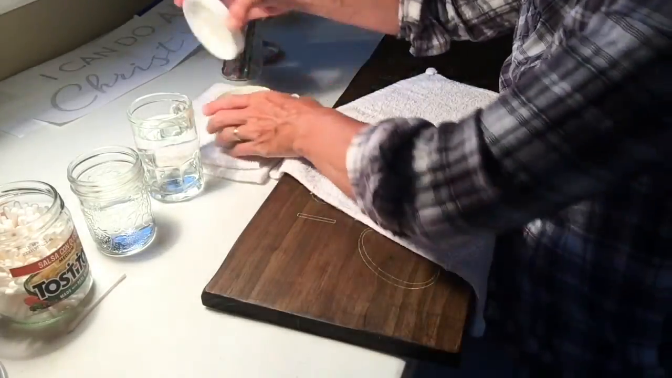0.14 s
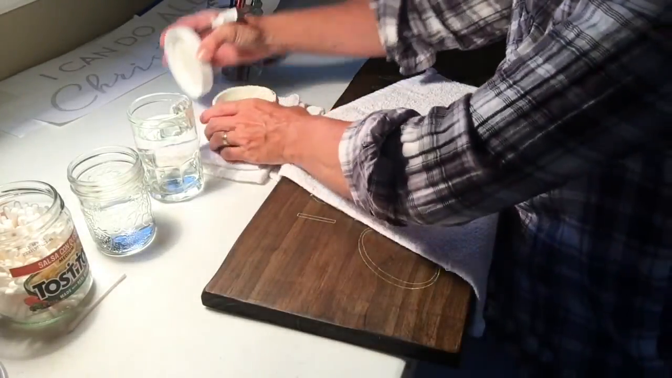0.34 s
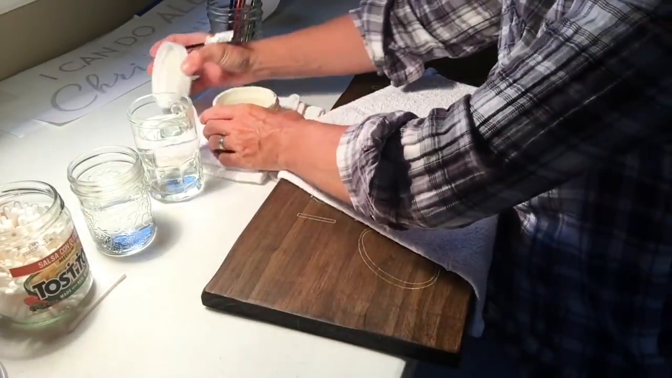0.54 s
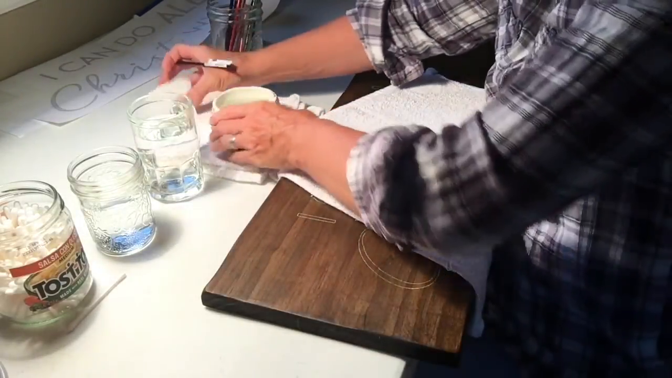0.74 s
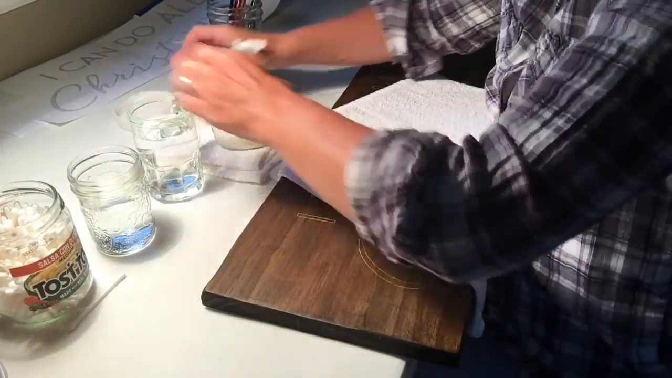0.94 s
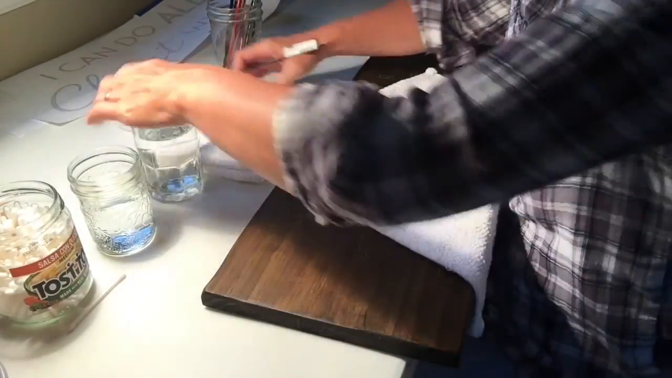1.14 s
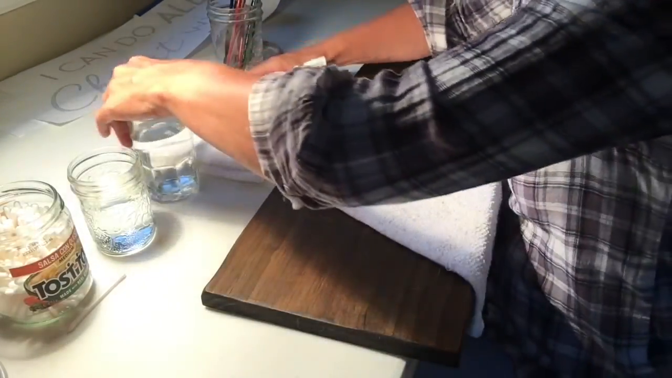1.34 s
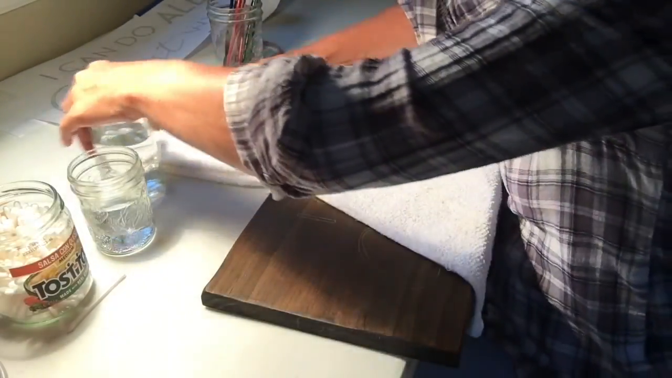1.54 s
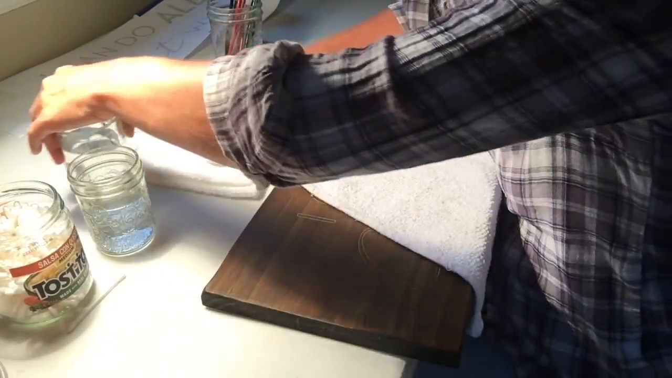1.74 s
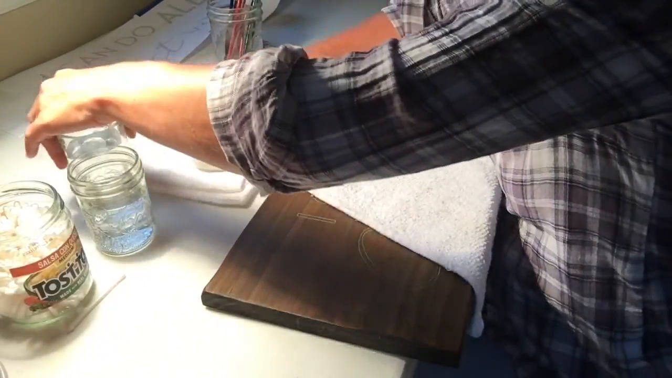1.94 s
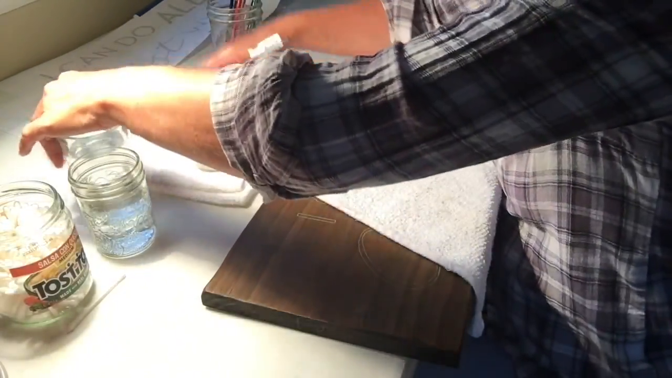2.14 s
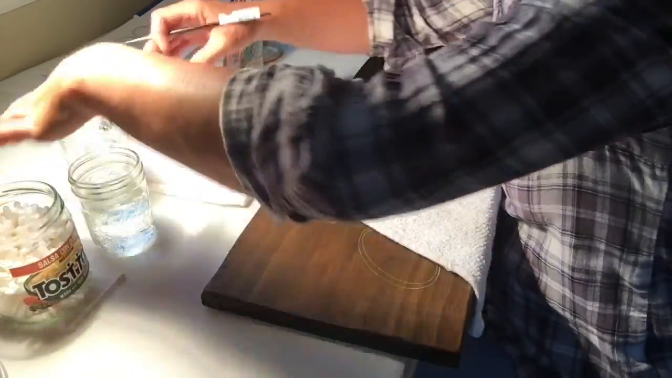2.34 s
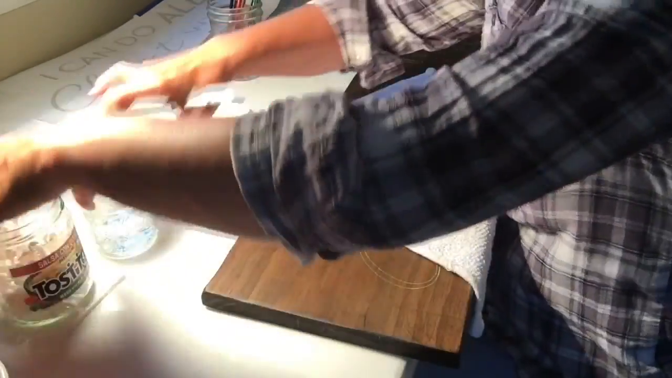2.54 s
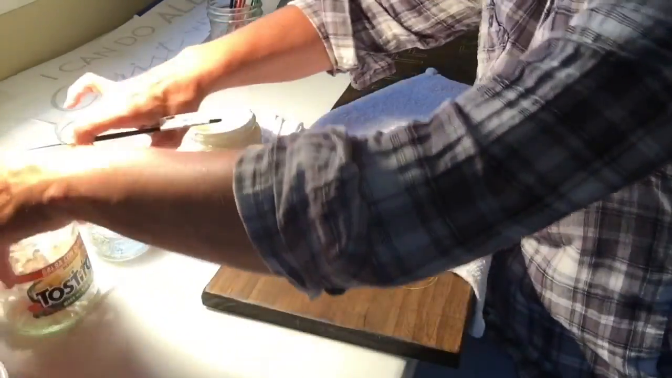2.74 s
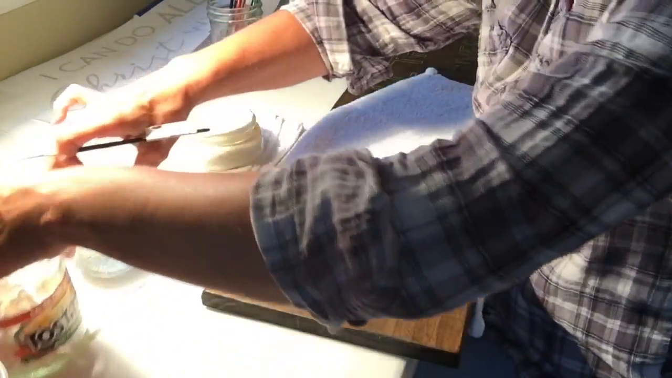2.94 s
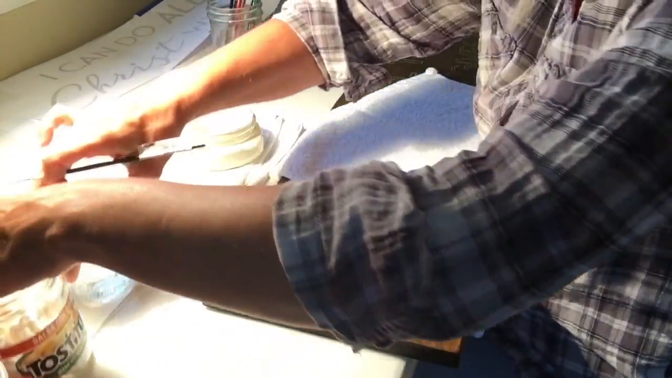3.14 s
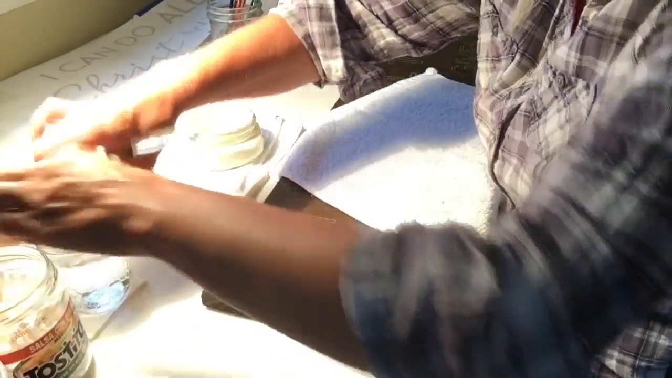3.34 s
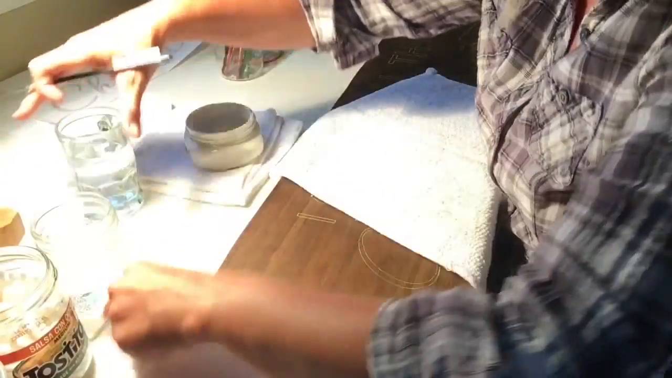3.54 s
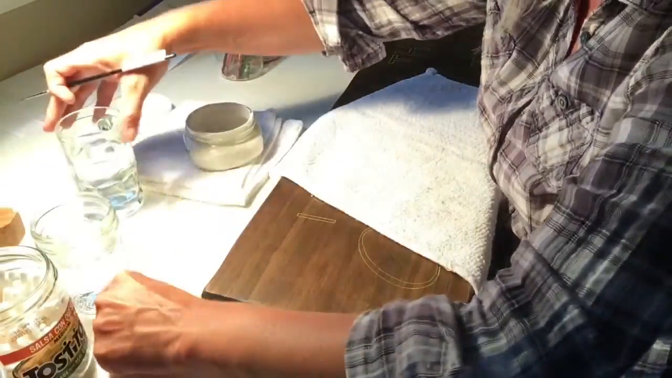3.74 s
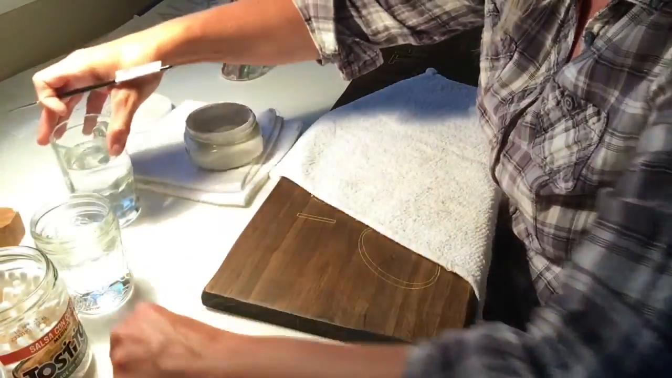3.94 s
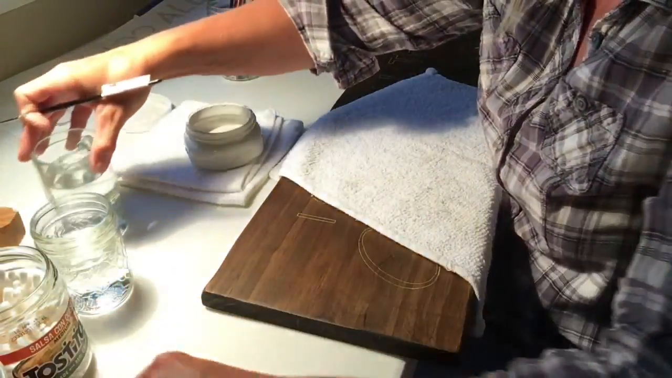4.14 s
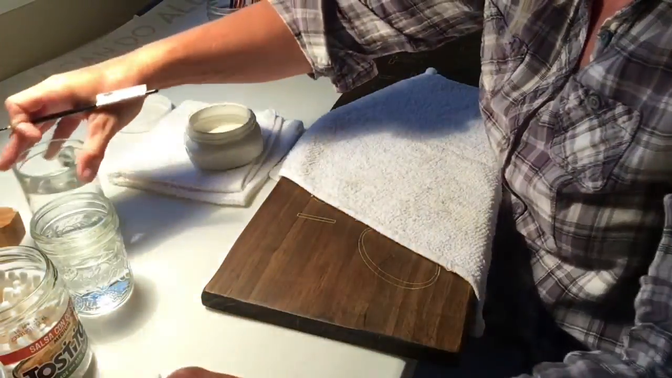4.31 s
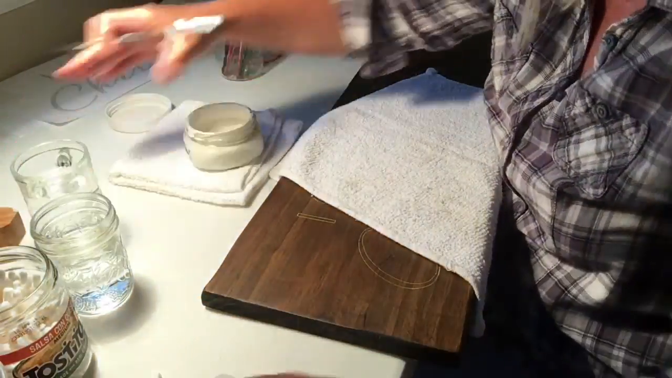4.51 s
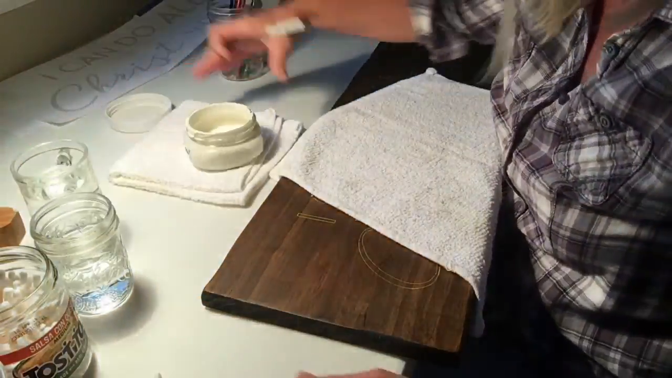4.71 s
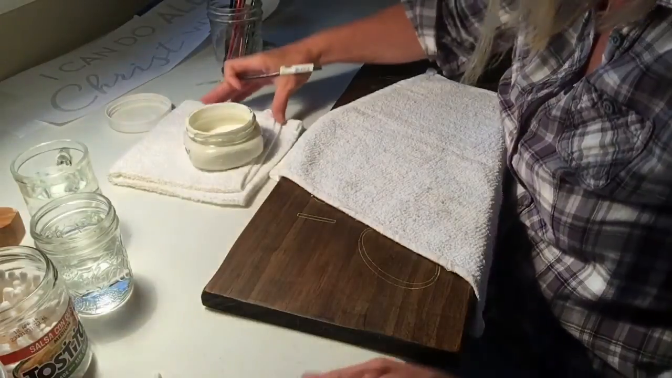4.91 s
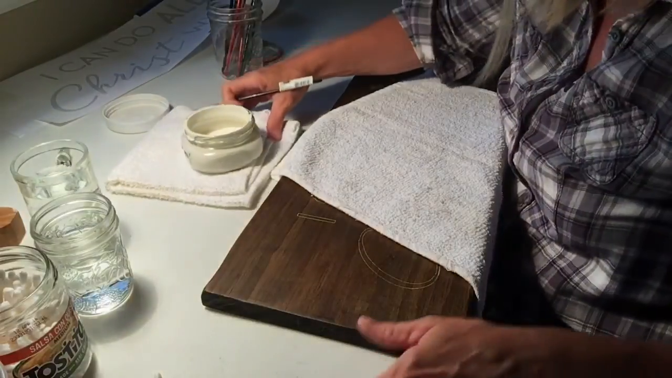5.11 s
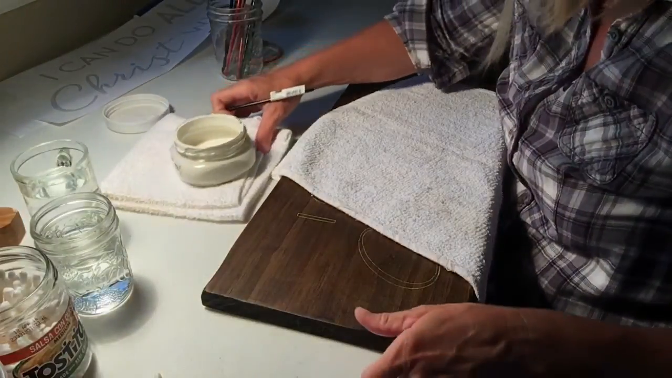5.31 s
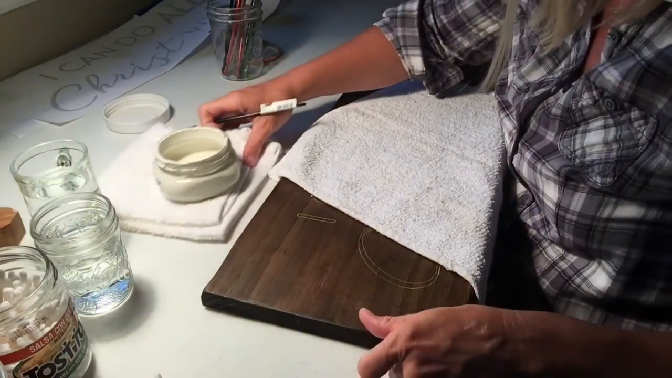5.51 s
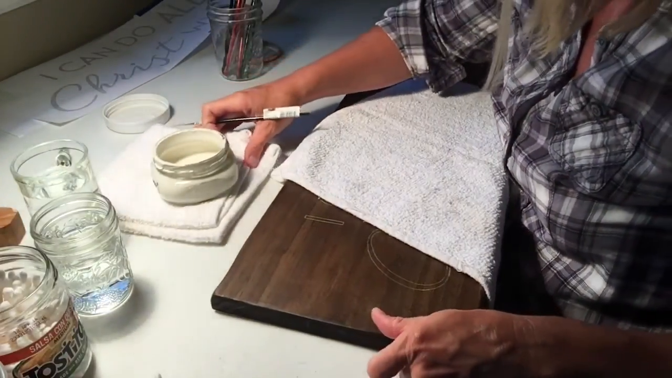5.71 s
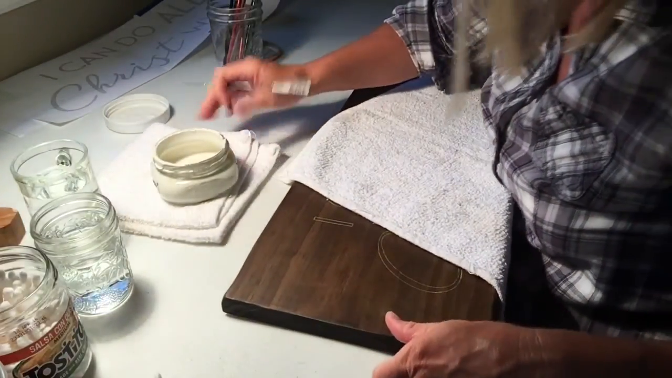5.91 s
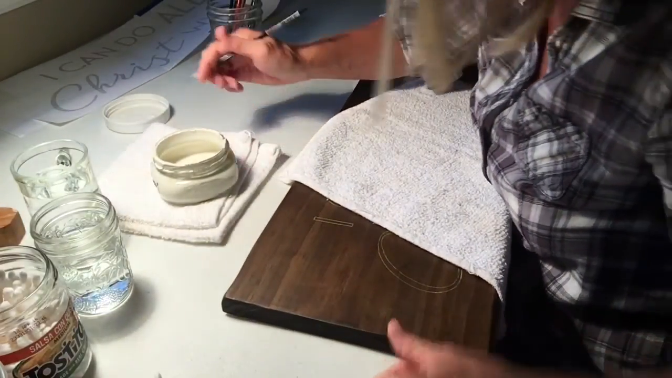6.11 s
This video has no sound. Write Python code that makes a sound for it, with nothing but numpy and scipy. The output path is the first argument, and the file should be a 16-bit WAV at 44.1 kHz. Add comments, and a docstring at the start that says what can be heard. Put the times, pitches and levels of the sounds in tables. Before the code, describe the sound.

Close up in a quiet little room, a few faint ticks lead to a lid clattering and sliding on a wooden tabletop. A glass jar scrapes along the wood and clinks twice against another with a short ring. Two more drags follow, making the hollow table rumble, and finally cloth rustles gently as a folded towel is pushed about.

```python
"""A small quiet room, close to a hollow wooden table that hands are clearing. A lid drops, bounces and
skids; water jars are dragged over the wood and clink together; a folded towel is pushed about.
Knocks are bursts of tiny contacts that ring the object and the table top, and clinks ring the glass
walls. Scrapes and rustles are dense slips of friction, with the table rumbling underneath."""
import sys
import numpy as np
from scipy import signal
from scipy.fft import rfft, irfft
from scipy.io import wavfile
from scipy.ndimage import uniform_filter1d

SR = 44100
rng = np.random.default_rng(int(sys.argv[2]) if len(sys.argv) > 2 else 0)


def digitize_waveform(pressure):
    """Quantize a signal to 16-bit integers and store it at the path in sys.argv[1].

    Rows of a 2-D input are taken as channels; values are limited to [-1, 1].
    """
    field = np.atleast_2d(pressure).T
    bounded = np.clip(field, -1, 1)
    quanta = np.round(bounded * 32767).astype(np.int16)
    wavfile.write(sys.argv[1], SR, quanta)


N = 276374

# modes of the table top: pitch_hz; and for each: level_db, t60_s
TOP_HZ = [95, 145, 196, 265, 357, 409, 480, 645, 696, 800, 873, 940, 1170]
TOP_RING = [(-63, .2), (-2, 1), (-15.5, 0.53), (-23, 0.16), (-19, 0.078), (-40, 0.053), (-13, 0.06),
            (-19, 0.19), (-34, 0.38), (-7.5, 0.082), (-21, 0.099), (-6.5, 0.047), (-25, 0.039)]
# brief modes of the lid and jar bases: pitch_hz; and for each: level_db, t60_s
OBJECT_HZ = [552, 700, 900, 1180, 1400, 2050, 2380, 2770, 3300, 4150, 5500]
OBJECT_RING = [(-1, .12), (-2, .06), (-5, .05), (-7, .04), (-6, .05), (-11, .03), (-10, .04), (-5, .06),
               (-12, .03), (-13, .04), (-20, .025)]
# spectra of a hard scrape on wood and of fine grit or fibres: freq_hz, level_db
SCRAPE_EQ = [(300, -48), (600, -7), (1000, -1), (1600, -4.5), (2200, -3), (2900, -1), (3500, -5.5),
             (4500, -8), (5200, -16), (9000, -30.5), (12000, -41)]
GRIT_EQ = [(3500, -30), (6000, -5.5), (8000, -13), (10500, -17.5), (13000, -13.5), (15500, -17.5)]


def gain_of(db):
    """Decibels to a factor."""
    return 10 ** (np.asarray(db) / 20)


def unit_rms(x):
    """Scales to rms 1."""
    return x / np.sqrt(np.mean(x ** 2) + 1e-20)


def curve_at(points, hz):
    """Joins points with straight lines on a log-frequency axis."""
    freq_hz, value = np.transpose(points)
    return np.interp(np.log(hz + 1), np.log(freq_hz + 1), value)


def add(mix, start_s, sound):
    """Mixes a sound in at start_s."""
    part = mix[round(start_s * SR):][:len(sound)]
    part += sound[:len(part)]


def colour(x, eq, tilt_db=0.):
    """Minimum-phase EQ of unit energy, tilted by tilt_db per octave about 2 kHz."""
    hz = abs(np.fft.fftfreq(4096, 1 / SR))
    shape_db = curve_at(eq, hz) + tilt_db * np.log2((hz + 50) / 2000)
    log_gain = np.log(gain_of(np.maximum(shape_db, -100)))
    taps = np.fft.ifft(np.exp(np.conj(signal.hilbert(log_gain)))).real[:2048]
    return signal.oaconvolve(x, taps / np.linalg.norm(taps))[:len(x)]


def modes(pitches_hz, rows):
    """Joins pitches with their levels and decays."""
    return [(hz, *row) for hz, row in zip(pitches_hz, rows)]


def ring(x, partials, tilt_db=0., free=1):
    """Each mode answers a click with a dying sine; free scales the ring time."""
    length_s = min(.5, .02 + free * max(t60 for *_, t60 in partials))
    t = np.arange(0, length_s, 1 / SR)
    tail = np.zeros(len(t))
    for hz, db, t60 in partials:
        decay_db = 60 * t / max(free * t60, .01)
        tail += gain_of(db + tilt_db * np.log2(hz / 3000) - decay_db) * np.sin(2 * np.pi * hz * t)
    attack = (1 - np.exp(-t / .0003)) ** 2  # contact takes a moment
    return signal.oaconvolve(x, tail * attack)[:N]


def softened(x, keep):
    """Light contacts last longer than a hard blow, so they are duller."""
    return signal.lfilter([1 - keep], [1, -keep], x)


def contacts(decay_s, per_s, after_db):
    """A first blow, then small irregular contacts that die away."""
    t = np.arange(SR // 4) / SR
    chance, size = rng.random((2, len(t)))
    x = gain_of(after_db) * (chance < per_s / SR) * (2 * size - 1) * np.exp(-t / decay_s)
    x[0] = 1
    return x


def bounces(decay_s, gap_s, after_db):
    """A first blow, then quick, nearly even rebounds that die away."""
    jitter, size = rng.random((2, 60))
    times_s = np.cumsum(gap_s * (.7 + .54 * jitter))
    x = np.zeros(SR // 2)
    x[(times_s * SR).astype(int)] = gain_of(after_db - 3.8 * size) * np.exp(-times_s / decay_s)
    x = softened(x, keep=.27)
    x[0] = 1
    return x


def friction(spread_db, flutter_db):
    """Dense slips of uneven size; the pressure flutters from bump to bump."""
    flutter = unit_rms(uniform_filter1d(uniform_filter1d(rng.standard_normal(N), 300), 300))
    size = gain_of(spread_db * rng.exponential(1, N) + flutter_db * flutter)
    return unit_rms(size * rng.standard_normal(N))


def short_strokes(rows):
    """Turns rise, hold and fall into curves of scrape and weight, each with its layer mix."""
    ease_db = np.array([-19.5, 0, 0, -19.5])
    strokes = []
    for start_s, rise_s, hold_s, fall_s, scrape_db, weight_db, *mix in rows:
        times_s = np.cumsum([start_s, rise_s, hold_s, fall_s])
        strokes.append((np.transpose([times_s, scrape_db + ease_db, weight_db + ease_db]), mix))
    return strokes


def envelopes(strokes):
    """Gains of scrape, weight, grit, sway, ring; grit and ring are set against scrape, sway weight."""
    # dB that grit, sway and ring lose for each dB their leading layer eases
    follow_ratios = [0.91, .5, 1.26]
    gains = np.zeros((5, N))
    for curve, mix in strokes:
        times_s, scrape_db, weight_db = np.transpose(curve)
        t = np.arange(times_s[0], times_s[-1], 1 / SR)
        fade = signal.windows.tukey(len(t), min(.03 / (times_s[-1] - times_s[0]), 1))
        layers_db = [scrape_db, weight_db]
        for offset_db, ratio, lead in zip(mix, follow_ratios, (scrape_db, weight_db, scrape_db)):
            layers_db.append(offset_db + lead.max() + ratio * (lead - lead.max()))
        for gain, db in zip(gains, layers_db):
            add(gain, times_s[0], gain_of(np.interp(t, times_s, db)) * fade)
    return gains


def room_tone():
    """Steady low room noise with a faint hiss."""
    # spectrum of the still room: freq_hz, level_db
    air_eq = [(12, -45), (20, -5.5), (67, 1.5), (138, -15.5), (222, -8.5), (328, -11), (485, -17.5),
              (678, -14), (759, -20.5), (949, -18.5), (2820, -25.5), (3950, -25), (4420, -28),
              (16000, -42.5)]
    shape = gain_of(curve_at(air_eq, np.fft.rfftfreq(N, 1 / SR)))
    return gain_of(-65) * unit_rms(irfft(rfft(rng.standard_normal(N)) * shape, N))


def pings():
    """Small things on the table ring faintly, one mode each."""
    # single rings: start_s, level_db, pitch_hz, t60_s
    cues = [(0.256, -65.5, 3120, 0.099), (2.472, -70, 1280, 3.9), (3.398, -58, 1290, 0.062),
            (3.537, -59, 1140, .06), (5.066, -45, 2040, 0.037), (5.217, -46.5, 2090, 0.042),
            (5.73, -48, 264, 0.31)]
    out = np.zeros(N)
    for start_s, level_db, pitch_hz, t60_s in cues:
        add(out, start_s, ring([1.], [(pitch_hz, level_db, t60_s)]))
    return out


def knocks():
    """Each landing ticks, rattles on, rings the object and thumps the table top."""
    # landings: start_s, tick_db, hardness_db_per_octave, thump_db, rattle_s
    cues = [(0.323, -56, 7, -58.5, 0.011), (0.4423, -51, 5.5, -73, 0.004), (0.5176, -47.5, 9, -62, 0.016),
            (0.5426, -32.5, 7.5, -58, 0.0028), (0.637, -50, 10.5, -77, 0.021),
            (0.7214, -16, 0.74, -22, 0.016), (0.987, -31, 1, -32, 0.022),
            (0.9904, -15.5, 2.6, -29.5, 0.016), (1.047, -18.5, 3.5, -34, 0.014),
            (1.0861, -22, 1.2, -44, 0.013), (1.0953, -21.5, 2, -49, 0.013), (1.3, -50, 1, -51, 0.0063),
            (2.0128, -26.5, 2, -35.5, 0.024), (2.2633, -34.5, 1.3, -47.5, 0.0025),
            (2.611, -42, 1, -73, 0.02), (2.7393, -42, -0.5, -39, 0.025), (3.368, -54, 19, -68, 0.004),
            (3.398, -47.5, 8, -59, 0.0048), (3.5366, -50, 4, -56, 0.0054), (3.6371, -52, 4, -69, 0.017),
            (5.0684, -44.5, 3.5, -74, 0.005), (5.6045, -44.5, 1.2, -57, 0.017),
            (5.7352, -48, -3, -47, 0.029), (5.8554, -44.5, -4, -53, 0.011), (6.078, -50.5, 10, -73, 0.021),
            (6.2375, -46.5, 1.3, -51, 0.012)]
    # spectrum of the tick: freq_hz, level_db
    tick_eq = [(88, -2), (150, -0.5), (396, -5.5), (1060, -9), (1200, -7.5), (1370, -9.5), (2020, -16.5),
               (2810, -16), (3480, -23), (5130, -27.5), (15500, -58)]
    out = np.zeros(N)
    for start_s, tick_db, hardness, thump_db, rattle_s in cues:
        touch = contacts(rattle_s, per_s=6000, after_db=-3.5)
        touch[0] = 0  # soften the rattle alone
        touch = softened(touch, keep=.38)
        touch[0] = gain_of(-4)  # the first contact stays sharp
        tick = colour(touch, tick_eq, hardness)
        add(out, start_s, gain_of(tick_db) * tick / abs(tick).max())
        body = ring(touch, modes(OBJECT_HZ, OBJECT_RING), hardness, free=.79)  # damped by pressing
        add(out, start_s, gain_of(tick_db - 27.5) * body)
        free = np.clip(.74 + .013 * (thump_db + 30), .2, .7)  # soft touches linger and damp the top
        push = contacts(rattle_s, per_s=370, after_db=-12)
        add(out, start_s, gain_of(thump_db) * ring(push, modes(TOP_HZ, TOP_RING), free=free))
    return out


def table_rumble(slips, modes_db):
    """The rubbed top: its upper modes stand out of a low roar; the load damps the two lowest."""
    # spectrum of the roar: freq_hz, level_db
    roar_eq = [(75, -21.5), (140, 5.5), (165, -15.5), (195, 1.5), (230, 0), (360, -0.4), (750, -12),
               (1500, -22.5), (2000, -36), (3300, -90.5)]
    upper = [(hz, db / 2, t60 / 2) for hz, db, t60 in modes(TOP_HZ, TOP_RING)[2:]]
    return unit_rms(colour(slips, roar_eq) + gain_of(modes_db) * unit_rms(ring(slips, upper)))


def hard_slide(strokes, slips, body, tilt_db=0.):
    """A hard object scrapes over grit and rings, while its weight makes the table rumble and sway."""
    # spectrum of the table's low sway: freq_hz, level_db
    sway_eq = [(30, -45), (50, -20), (80, 0), (105, -0.5), (145, -4.5), (180, -30.5), (300, -61)]
    scrape, weight, grit, sway, ringing = envelopes(strokes)
    return (scrape * colour(slips, SCRAPE_EQ, tilt_db)
            + weight * table_rumble(slips, modes_db=-12)
            + grit * colour(friction(spread_db=2, flutter_db=1.5), GRIT_EQ)
            + sway * colour(rng.standard_normal(N), sway_eq)
            + ringing * unit_rms(body))


def lid_skids():
    """The lid skids after each drop, sliding duller than glass."""
    # skids: start_s, rise_s, hold_s, fall_s, scrape_db, weight_db, grit_db, sway_db, ring_db
    cues = [(.73, 0.017, .115, 0.031, -51.5, -41.5, -22.5, -27, 8.5),
            (.875, 0.045, 0.059, 0.015, -52, -48, -34, -33, 10),
            (.995, 0.0095, 0.1, 0.1, -41, -43.5, -35, -22, -3.5)]
    slips = friction(spread_db=2.5, flutter_db=1.5)
    body = ring(slips, modes(OBJECT_HZ, OBJECT_RING), tilt_db=-2, free=.49)
    return hard_slide(short_strokes(cues), slips, body, tilt_db=-2)


def jar_drags():
    """Glass dragged over wood: friction rings the base of the jar."""
    # long drags, one curve each: time_s, scrape_db, weight_db
    drags = [
        [(1.34, -65, -71), (1.356, -62, -66), (1.434, -53, -64), (1.454, -49, -36.5), (1.524, -45.5, -59.5),
         (1.672, -46.5, -47), (1.956, -61.5, -70.5), (2.0, -64, -63)],
        [(2.69, -70, -66), (2.738, -57.5, -42.5), (2.826, -49, -37), (2.868, -41, -27), (2.972, -39, -26),
         (3.278, -54.5, -39.5), (3.494, -103, -86), (3.5, -86, -77)],
        [(3.76, -70, -74), (3.79, -64.5, -68.5), (3.98, -50, -47.5), (4.07, -46.5, -49), (4.228, -49.5, -49.5),
         (4.388, -60.5, -57), (4.452, -82, -78), (4.46, -76, -87)],
    ]
    # layer offsets at the peak of each drag: grit_db, sway_db, ring_db
    drag_mixes = [(-18.5, -2.5, -41), (-31, -11, -8), (-15.5, -6, -6)]
    # slides after a touch: start_s, rise_s, hold_s, fall_s, scrape_db, weight_db, then offsets as above
    slides = [(2.025, 0.0079, 0.025, 0.13, -60, -44, -25, -1.7, -6),
              (2.285, .012, .015, 0.17, -66, -63, -22, 3, -5),
              (2.598, 0.01, 0.027, 0.04, -62.5, -65, -10, -10, -7),
              (3.628, 0.01, 0.015, 0.098, -56.5, -51.5, -10, -14, -13)]
    # resonances of the base: pitch_hz, width_hz, level_db
    base_bands = [(2880, 96, 5.5), (2694, 54, 1), (3160, 200, -2), (1880, 120, -20), (4190, 120, -18),
                  (5150, 250, -12.5)]
    base_modes = [(hz, db + 20 * np.log10(width / 100), 2.2 / width) for hz, width, db in base_bands]
    slips = friction(spread_db=2.5, flutter_db=1.5)
    strokes = [*zip(drags, drag_mixes), *short_strokes(slides)]
    return hard_slide(strokes, slips, ring(slips, base_modes))


def jar_clinks():
    """Each touch rings both jars; rebounds keep breaking up the ring."""
    # touches: start_s, blow_db, first_jar_share, hardness_db_per_octave, chatter_s, chatter_db, dull_db
    cues = [(2.014, -27.5, 0.21, 1, 0.055, -3, 1.5), (2.264, -37.5, 0.99, -6, 0.0028, 3, 3),
            (2.351, -60.5, 0.3, 4, 0.0066, 4, 9), (2.611, -53, 0.8, -7, 0.013, 10.5, 5.5),
            (2.664, -58, 0.5, -7, 0.027, 1, -16.5)]
    # wall modes of each jar: pitch_hz; and for each mode: level_db, t60_s
    first_hz = [2457, 2958, 3107, 3880, 5592, 6158, 6280, 8296, 12630, 13957, 15715]
    first_ring = [(-6, 0.56), (-8, 0.24), (8, 0.08), (-19, 0.07), (-5.5, 0.19), (-28, .1), (-16, 0.15),
                  (-6, 0.099), (-46, .1), (-19, 0.083), (-19, .12)]
    second_hz = [2488, 2900, 2976, 3200, 3274, 3536, 3978, 6310, 8122, 8240, 10100, 13600]
    second_ring = [(-2, 0.13), (-20, 0.15), (-16, 0.11), (7, 0.027), (-18, 0.059), (-6.5, 0.041),
                   (-18, 0.079), (-12.5, 0.076), (-18, 0.17), (-21.5, 0.12), (-38, 0.092), (-38, 0.074)]
    # dull knock of the table top under the jars: pitch_hz, level_db, t60_s
    under_table_modes = [(1070, 5, 0.0089), (1320, 3, 0.01), (607, -13.5, 0.028)]
    out = np.zeros(N)
    for start_s, blow_db, share, hardness, chatter_s, chatter_db, dull_db in cues:
        touch = gain_of(blow_db) * bounces(chatter_s, gap_s=.0042, after_db=chatter_db)
        add(out, start_s, share * ring(touch, modes(first_hz, first_ring), hardness))
        add(out, start_s, (1 - share) * ring(touch, modes(second_hz, second_ring), hardness))
        add(out, start_s, gain_of(dull_db) * ring(touch, under_table_modes))
    return out


def towel_pushes():
    """Towel and sleeves brush the wood; light cloth leaves the top free to hum."""
    # pushes: start_s, rise_s, hold_s, fall_s, rustle_db, weight_db, fibre_offset_db, hum_offset_db
    cues = [(4.569, .1, 0.04, 0.12, -56.5, -77, -11, -10),
            (4.786, 0.038, 0.014, 0.02, -70, -78.5, -33, -11.5),
            (4.908, 0.061, 0.054, 0.033, -58.5, -84, -11, -8),
            (5.036, 0.072, 0.47, 0.096, -56, -66.5, -13.5, 3),
            (5.576, 0.15, 0.16, 0.23, -59.5, -60, -21, 2.5),
            (6.07, 0.027, 0.052, 0.048, -62.5, -72, -10.5, 7),
            (6.163, 0.058, 0.0095, 0.05, -63, -69, -6.5, 8)]
    # spectrum of the cloth: freq_hz, level_db
    rustle_eq = [(300, -31), (750, -8), (1000, 0.5), (1600, -1), (2300, -1), (2800, 0), (3600, -5.5),
                 (4300, -6), (5000, -15), (9000, -32), (12000, -75)]
    slips = friction(spread_db=1, flutter_db=1.4)
    rustle, weight, fibres, hum, _ = envelopes(short_strokes(cues))
    return (rustle * colour(slips, rustle_eq)
            + weight * table_rumble(slips, modes_db=2.5)
            + fibres * colour(slips, GRIT_EQ)
            + hum * unit_rms(ring(slips, modes(TOP_HZ, TOP_RING)[:2], free=.28)))


def room_echoes(x):
    """Sparse echoes of random sign, each band dying at its own speed; the bass stays dry."""
    # decay of the room: freq_hz, t60_s
    decay_times = [(200, 0.33), (1000, 0.37), (4000, 0.23), (12000, 0.17)]
    taps = np.zeros(SR // 2)
    slots = np.arange(150, len(taps) - 20, 20)
    taps[slots + rng.integers(0, 20, len(slots))] = rng.choice([-1., 1.], len(slots))
    hz, t, bands = signal.stft(taps, SR, nperseg=256)
    decay = gain_of(-60 * t / curve_at(decay_times, hz)[:, None])
    tail = signal.istft(bands * decay * (hz[:, None] > 300), SR, nperseg=256)[1]
    return signal.oaconvolve(x, tail / np.linalg.norm(tail))[:N]


def scene():
    """Hits and rubbing with their echoes, over the room tone; the deepest bass is thin."""
    knocking = knocks()
    ringing = pings() + jar_clinks()
    rubbing = lid_skids() + jar_drags() + towel_pushes()
    send = gain_of(-7) * knocking + gain_of(-11.5) * ringing + gain_of(-12) * rubbing
    mix = knocking + ringing + gain_of(-1.5) * rubbing + room_echoes(send)
    low_cut = signal.butter(4, 65, "high", fs=SR, output="sos")
    return (signal.sosfilt(low_cut, mix) + room_tone())[None]


def record(dry):
    """A steep high cut at 15.9 kHz."""
    high_cut = signal.firwin(511, 15900, window=("kaiser", 9), fs=SR)
    return signal.oaconvolve(dry, high_cut[None], "same")


dry = scene()
out = record(dry)
digitize_waveform(out)
```